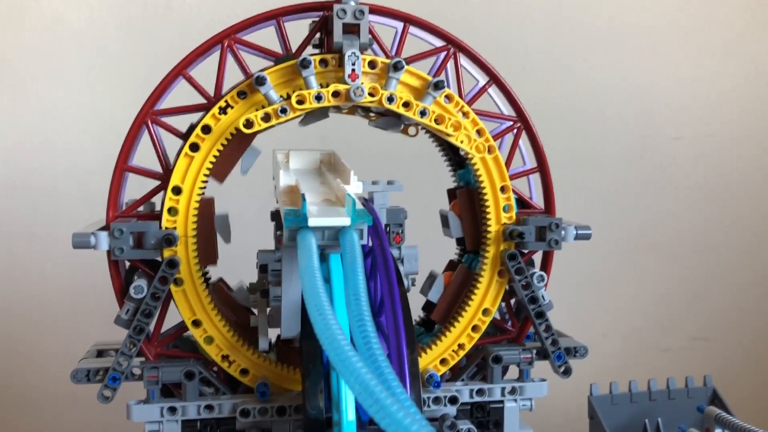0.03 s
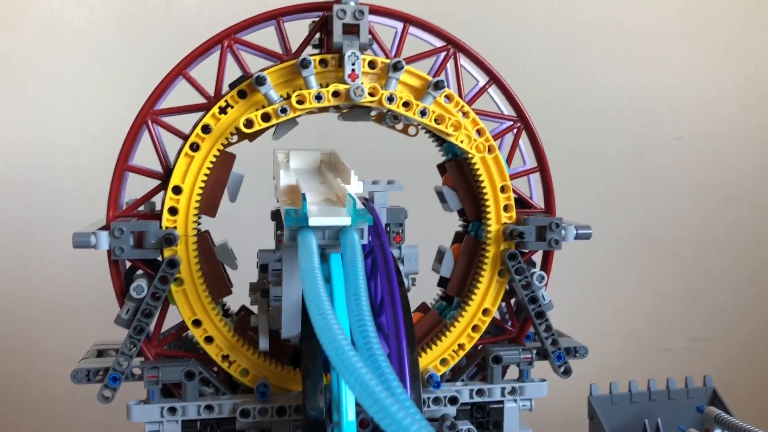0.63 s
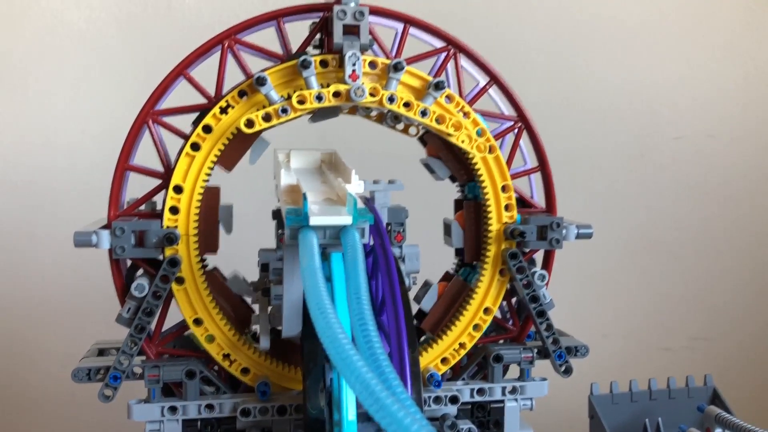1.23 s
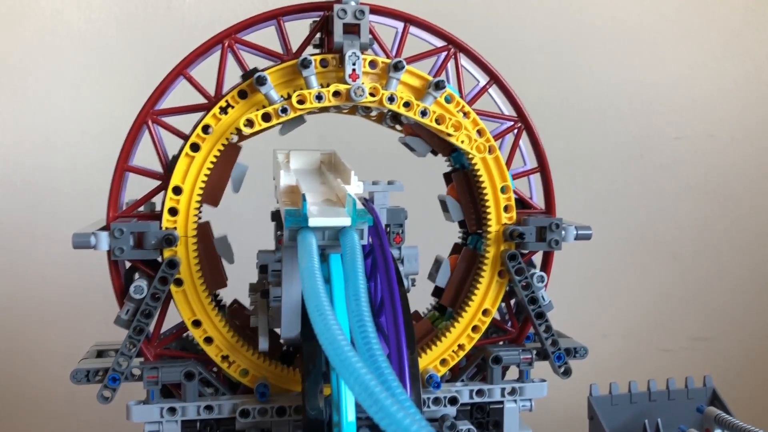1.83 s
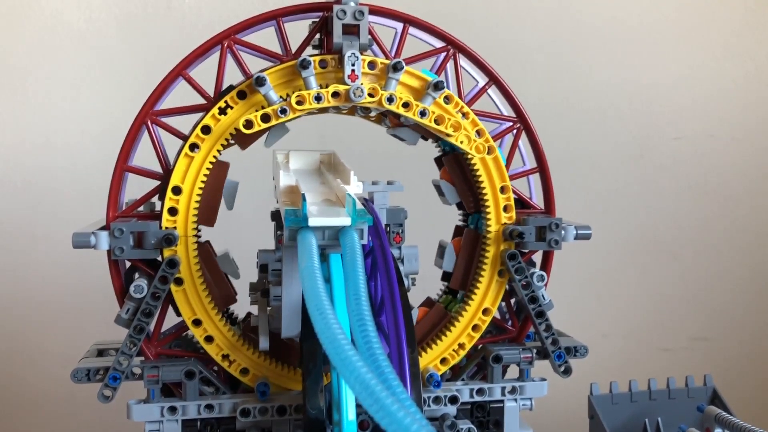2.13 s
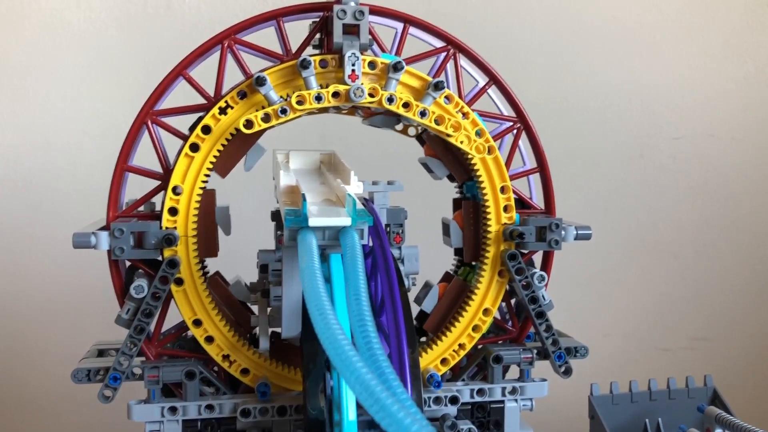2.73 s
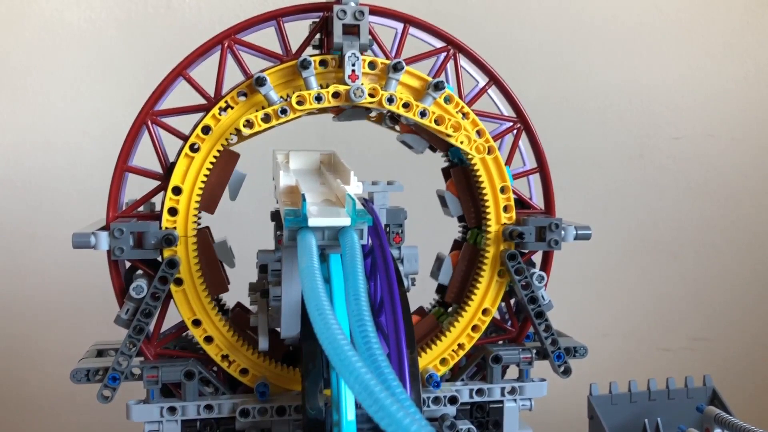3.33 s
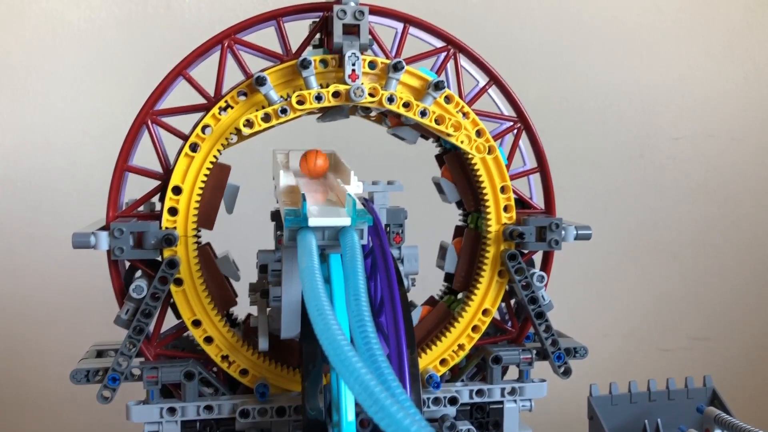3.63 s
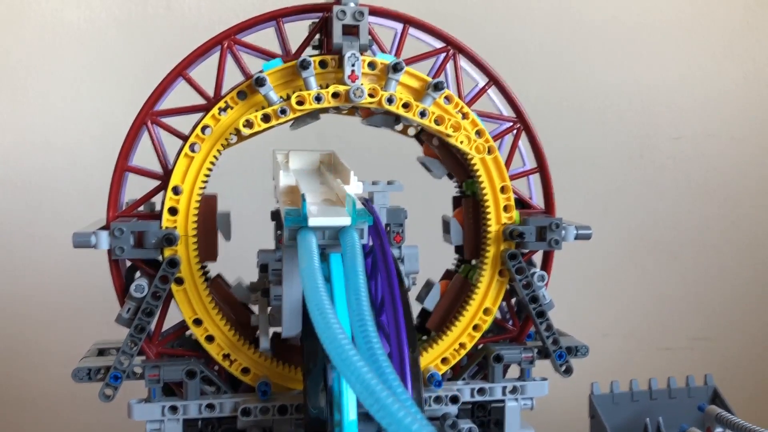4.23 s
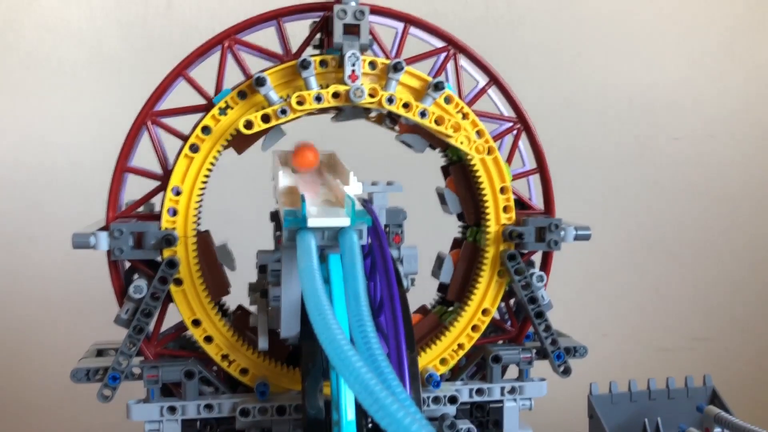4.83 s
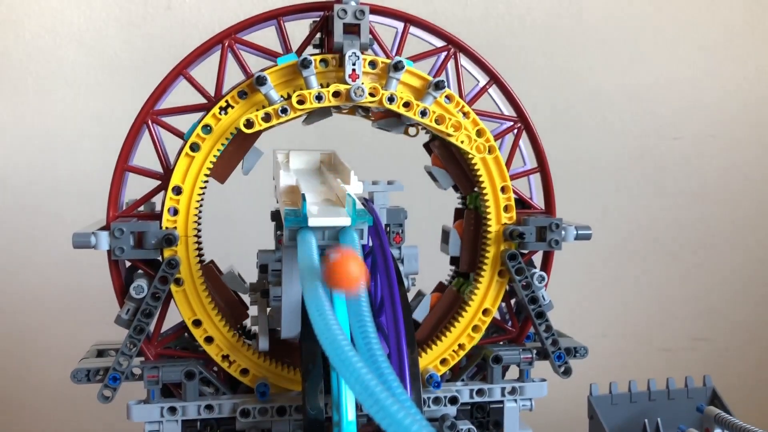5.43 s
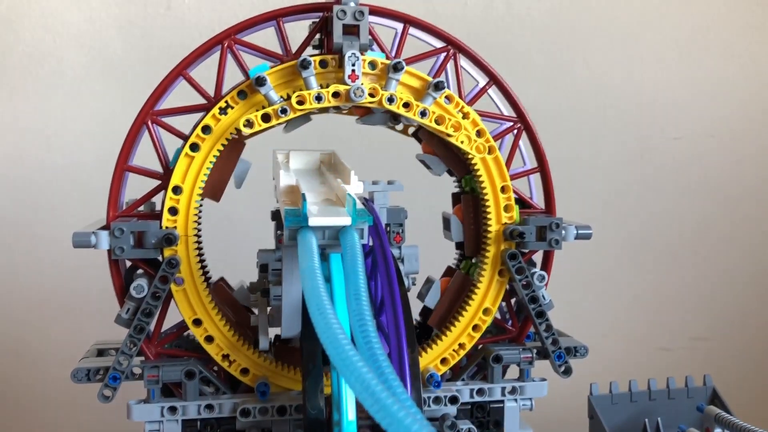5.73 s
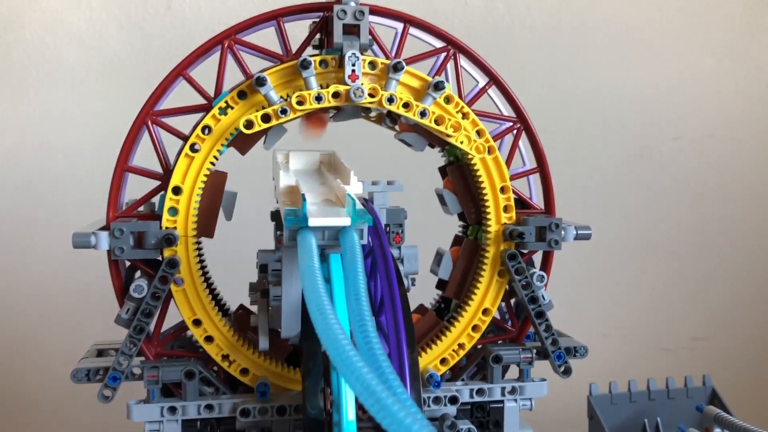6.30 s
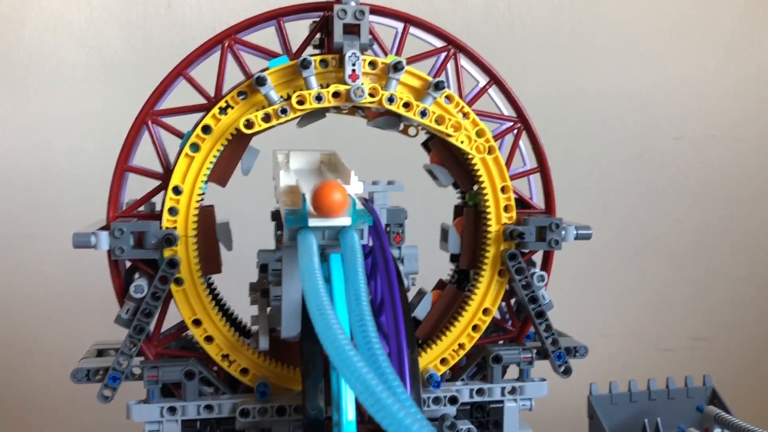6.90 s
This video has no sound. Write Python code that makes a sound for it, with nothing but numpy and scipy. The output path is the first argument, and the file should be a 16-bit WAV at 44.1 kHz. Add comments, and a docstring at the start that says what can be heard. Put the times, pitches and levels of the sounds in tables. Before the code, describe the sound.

A small electric motor drives a big wheel of plastic toy bricks, heard close by in a small room. For all seven seconds it hums over a low growl, with a thin gear whine, a fast rasp of teeth and small irregular ticks. A plastic ball clacks onto a chute right at the start. Parts of the wheel snap over with bright clicks and brief rattles, most clearly at the start and around 1.5, 3 and 4.3 seconds. A lighter ball clatter comes at about 3.7 seconds. Around 4.5 seconds a ball rumbles softly in its pocket, then lands on the chute at 4.9 with a sharp clack, bounces a few times and rolls away, tapping over the seams. Another rumbles near 6 seconds, lands at 6.3, bounces and rolls off by about 6.8 while the motor keeps running.

```python
"""A small electric motor turns a big toy wheel of plastic bricks, close by in a small room.
A plastic ball clacks onto a brick chute at the start, over a drive that runs throughout: the motor
hums, axles growl in the frame, the gearbox whines and its teeth rasp. Until 4.4 s parts of the wheel
snap over and rattle loose bricks. Then a ball rumbles over the top in its pocket, drops onto the chute
at 4.9 s, bounces a few times and rolls away. The next one follows at 6.3 s."""
import sys
import numpy as np
from scipy import signal
from scipy.fft import rfft, irfft, next_fast_len
from scipy.io import wavfile
from scipy.ndimage import map_coordinates

SR = 44100
rng = np.random.default_rng(int(sys.argv[2]) if len(sys.argv) > 2 else 0)


def unload_audio(sound):
    """Save the sound as a 16-bit wav file, at the path given as the first command line argument."""
    columns = np.transpose(np.atleast_2d(sound))
    # keep every value between -1 and 1, then stretch to whole-number steps
    steps = np.round(np.clip(columns, -1, 1) * 32767)
    wavfile.write(sys.argv[1], SR, steps.astype(np.int16))


N = 311346
TIME = np.arange(N) / SR
COMMUTATOR_HZ, MESH_HZ = 411.9, 75.0  # six times the rotor rate; pinion teeth landing per second

# Partials of the hum: (multiple of the rotor rate)
HUM_ORDERS = [2, 3, 6]
# Level rides for the hum at twice and at three times the rotor rate: (time [s], level [dB])
SECOND_ORDER_RIDE = [(0.0, -48.5), (0.8, -57), (1.85, -47.5), (2.15, -89), (3.8, -57), (4.3, -57.5),
                     (7.06, -57)]
THIRD_ORDER_RIDE = [(0.0, -48), (0.19, -48), (0.3, -59), (1.55, -53), (2.08, -78), (2.2, -43.5),
                    (2.82, -51), (2.93, -54), (3.05, -47), (3.52, -72), (3.7, -39.5), (3.88, -56),
                    (4.05, -47.5), (5.05, -44.5), (5.35, -51), (7.06, -48.5)]

def motor_hum(rotor_turns, commutator_db=-48, mains_hz=94, mains_db=-62):
    """Two nearly clean rotor partials follow the load, over a commutator tone and faint mains hum."""
    levels_db = [*in_time(SECOND_ORDER_RIDE), *in_time(THIRD_ORDER_RIDE), commutator_db]
    out = from_db(mains_db) * np.sin(2 * np.pi * mains_hz * TIME)
    for order, db in zip(HUM_ORDERS, levels_db):
        level = from_db(db + 2.0 * drift(13))
        out += level * np.sin(2 * np.pi * (order * rotor_turns + 0.051 * drift(8.3)))
    return out


# The gear train under its slowly changing load: (time [s], growl level [dB], whine pitch [Hz])
LOAD_RIDE = [(0.0, -43, 2430), (0.9, -45, 2457), (1.5, -44.5, 2443), (2.7, -45.5, 2425), (4.0, -45, 2416),
             (4.7, -43, 2427), (5.4, -45, 2410), (5.8, -42.5, 2480), (6.3, -42.5, 2410),
             (7.06, -44.5, 2486)]
# Resonances of the brick frame: (pitch [Hz], width [Hz], level [dB])
FRAME_RESONANCES = [(126.6, 36, -6.5), (198.2, 24, -1), (293, 77, -1), (409.4, 101, 0), (534.6, 61, -2.5),
                    (641.5, 53, -4), (1016, 125, -7), (1632, 99, -11.5), (2137, 200, -16)]

def axle_growl(rotor_turns):
    """Loose axles knock in the frame with each turn of the rotor and of a gear three times slower."""
    growl_db, _ = in_time(LOAD_RIDE)
    level = from_db(growl_db + .8 * drift(14))
    gear_angle = 2 * np.pi * rotor_turns / 3
    throb = np.exp(0.25 * sum(np.cos(k * gear_angle) for k in range(1, 4)))
    knocks = rng.standard_normal(N) * throb * from_db(-0.55 * drift(120))
    frame = sum((-1) ** k * from_db(db) * steep_resonance(knocks, hz, 1.05 * width)
                for k, (hz, width, db) in enumerate(FRAME_RESONANCES))
    return level * rms_one(frame)


# Tight spots of the slow shafts drag the motor: (rate [turns/s], first tight spot [s], pitch sag [Hz])
PITCH_SAGS = [(2.185, .433, 5), (1.52, .58, 3)]

def gear_whine(level_db=-53.5, wander_hz=6, jitter_hz=23.9, roughness=0.47):
    """The first, fast gear pair sings a raspy tone: uneven teeth spread noise around its pitch."""
    _, load_hz = in_time(LOAD_RIDE)
    sag_hz = sum(hz * np.cos(2 * np.pi * rate * (TIME - s)) for rate, s, hz in PITCH_SAGS)
    pitch_hz = load_hz - sag_hz + wander_hz * drift(12) + jitter_hz * drift(150)
    phase = 2 * np.pi * np.cumsum(pitch_hz) / SR
    tone = np.sin(phase) * from_db(2.0 * drift(40))
    grit = drift(260) * np.sin(phase) + drift(260) * np.cos(phase)
    return from_db(level_db) * rms_one(tone + roughness * grit)


# How hard each of the eight pinion teeth meshes: (accent [dB])
TOOTH_ACCENTS = [6, 3.5, 2.5, 6.5, -23, 5, 6, -18.5]
# Tone colour of the rasp: (frequency [Hz], level [dB])
RASP_EQ = [(1500, -12.5), (2700, -9.5), (3250, -13), (4250, -11.5), (5400, -8.5), (6000, -6), (6400, -6),
           (7200, -1), (7800, -4.5), (8500, -3), (10000, -8), (11900, -7), (12600, -10), (13900, -5),
           (14800, -9.5), (15600, -6.5)]
# Beams and gear wheels that the teeth set whirring: (pitch [Hz], width [Hz], level [dB])
WHIRR_RESONANCES = [(2106, 220, -65), (3090, 130, -65.5), (3590, 160, -60), (4100, 110, -66),
                    (4450, 150, -63.5), (4806, 72, -61), (5440, 120, -65), (6000, 230, -56),
                    (6710, 200, -59.5), (7230, 490, -51), (8440, 750, -53), (11950, 670, -64)]

def tooth_rasp(teeth, rasp_db=-41, slip_share=0.27, sliding=0.98):
    """Each tooth lands with a short scratch over steady sliding friction; plastic parts whirr along."""
    tooth = teeth.astype(int)
    accent_db = np.array(TOOTH_ACCENTS)[tooth % len(TOOTH_ACCENTS)]
    accent_db = accent_db + 3.5 * rng.uniform(-1.1, 1, 1000)[tooth]
    scratch = from_db(accent_db) * np.exp(-(teeth % 1) / slip_share)
    force = np.hypot(sliding, scratch)
    friction = rng.standard_normal(N) * force * from_db(drift(500))
    out = from_db(rasp_db) * coloured(friction, RASP_EQ)
    for hz, width, db in WHIRR_RESONANCES:
        rub = rng.standard_normal(N) * force * from_db(2.5 * drift(40))
        out += from_db(db) * rms_one(steep_resonance(rub, hz, width))
    return out


# Each shaft binds once a turn and swells the chatter: (rate [turns/s], first tight spot [s], swing [dB])
SHAFT_SWELLS = [(1.75, .02, 1.3), (5.15, 0, 1.1), (6.92, 0, 1.1), (19.205, .046, 1.9), (27.926, 0, 1.0)]

def gearbox_chatter(teeth, level_db=-50, housing_hz=1244.4, jitter_hz=22.23):
    """A rough gear tone in a housing resonance, shaken three times a turn by the eight-tooth pinion."""
    binding_db = sum(db * np.cos(2 * np.pi * rate * (TIME - s)) for rate, s, db in SHAFT_SWELLS)
    level = from_db(level_db + binding_db + 1.9 * drift(90))
    throb = np.exp(0.16 * np.cos(2 * np.pi * teeth * 3 / 8))
    tone = np.sin(2 * np.pi * np.cumsum(housing_hz + jitter_hz * drift(70)) / SR)
    rattle = steep_resonance(rng.standard_normal(N), housing_hz, width=196)
    return level * rms_one((rms_one(tone) + from_db(-1.0) * rms_one(rattle)) * throb)


# Ticks in the housing and lower knocks in the frame: (time [s], peak [dB], pitch [Hz])
CATCH_CUES = [(0.154, -33, 1270), (0.275, -34, 422), (0.576, -40, 1250), (0.723, -37, 1280),
              (0.754, -37.5, 1260), (0.974, -37, 1250), (1.185, -37.5, 1250), (1.192, -35, 430),
              (1.292, -33.5, 1270), (1.399, -39, 1290), (1.716, -35, 1250), (1.756, -35.5, 1260),
              (1.824, -40, 1240), (1.89, -33, 423), (2.171, -43, 1270), (2.433, -36, 1240),
              (2.743, -34, 1240), (2.859, -33, 415), (2.966, -39, 1260), (3.114, -33.5, 1250),
              (3.335, -39, 1270), (3.475, -31, 1240), (3.582, -34, 1260), (3.608, -31, 422),
              (3.687, -37, 1250), (3.83, -34, 420), (3.901, -41, 1250), (4.046, -33, 420),
              (4.046, -38, 1260), (4.507, -38.5, 1260), (4.696, -33, 413), (4.73, -42, 1250),
              (4.839, -32, 420), (5.049, -32.5, 1270), (5.611, -36.5, 1290), (5.769, -35, 1260),
              (5.982, -38, 1260), (6.267, -43, 1250), (6.773, -31, 444), (6.874, -37, 1280),
              (6.914, -36, 1240), (7.021, -30.5, 1260)]

def gear_catches(half_length_s=0.0044):
    """A catching gear drives one resonance for a few milliseconds."""
    t = TIME[:SR // 10] - .05
    out = np.zeros(N)
    for s, db, hz in CATCH_CUES:
        detuned_hz = hz * (1 + 0.022 * rng.standard_normal())
        tone = np.sin(2 * np.pi * (detuned_hz * t + rng.random()))
        add(out, s + t[0], from_db(db) * tone * np.exp(-(t / half_length_s) ** 2))
    return out


# Ring of the chute: (pitch [Hz], level within its band [dB], t60 [s])
CHUTE_RING = [(2053, -3, 0.051), (2344, 4.5, 0.028), (2450, 1.5, 0.021), (2640, -10, 0.034),
              (2740, -3.5, 0.032), (2870, -9, 0.077), (2965, -4, 0.049), (3193, 1, 0.026),
              (3790, -5, 0.021), (4340, -3, 0.019), (5090, 0, 0.016), (5830, 0.5, 0.011), (6600, -4, 0.017),
              (6860, -5, 0.015), (7870, 2, 0.0068), (9030, -1, 0.0052), (10300, 4, 0.0033),
              (12100, 4, 0.0051), (13600, -2, 0.006), (15300, -3, 0.0056)]
# Landings and bounces: (time [s], six band levels [dB], brick pitch [Hz], brick ring over its band [dB])
BALL_CUES = [(0.0054, -29, -41, -32, -32, -36, -42, 2320, 17),
             (3.6529, -37.0, -29.5, -28, -25, -29.5, -30, 7300, -3),
             (3.7027, -43, -38, -38, -28, -34, -29, 5930, -7),
             (3.7346, -56.0, -46, -44, -34, -43, -45.0, 6010, -4),
             (4.862, -11.5, -18.5, -22.5, -24, -25, -31, 2490, 0),
             (4.9, -24, -26, -19, -26, -31, -30, 4400, 1),
             (4.9095, -56.0, -28, -57.5, -50.0, -53.5, -53.0, 2900, 8),
             (4.9528, -20, -32, -26.5, -22, -23, -27, 7080, 4),
             (4.9703, -20.5, -31, -49, -20, -35.0, -34, 5760, 5),
             (5.0676, -52.5, -42, -55, -35.5, -35, -42.0, 7760, -2),
             (6.3113, -13, -18.5, -26, -24.5, -29, -43, 2432, 0.5),
             (6.3521, -28, -21, -24.5, -23.5, -27.5, -29, 6200, 5),
             (6.3615, -32, -26, -57.5, -50.0, -53.5, -53.0, 2880, 4),
             (6.3875, -28, -23.5, -31, -39, -42.5, -45.0, 3130, 5),
             (6.4075, -31.0, -38.0, -44.5, -31, -36, -37, 5900, 1),
             (6.415, -26, -47.0, -52.0, -50.0, -53.5, -53.0, 2350, 12),
             (6.4355, -54, -33, -48, -48, -53.5, -50.5, 3170, 6),
             (6.4613, -34.5, -34, -32.5, -24.5, -29.5, -28, 5960, -8),
             (6.7555, -39, -45, -47, -42, -37, -49, 2340, -6)]

def ball_drops():
    """Plastic balls land on the brick chute and bounce with hard clacks."""
    return impacts(BALL_CUES, CHUTE_RING, crack_db=-4, crack_t60=0.022, brick_t60=0.023,
                   knock_db=-47.5, thud_db=-46.0, thud_t60=0.24,
                   wall_hz=4600, tail_t60=0.25, wet_db=-16, gain_db=-1.5)


# Taps on the seams: (time [s], three low band levels [dB], brick pitch [Hz], ring over its band [dB])
SEAM_CUES = [(4.9965, -42, -41, -46, 2730, 0), (5.1244, -48, -52, -46, 3730, 0),
             (5.1696, -32, -43, -52, 2420, -2), (5.2390, -48, -48, -42, 4000, 0),
             (5.2933, -43, -46, -44, 4300, -6), (6.5230, -48, -38, -41.5, 2890, 2),
             (6.5570, -40, -44, -43, 2920, 0), (6.6240, -34.5, -37, -52, 3190, 1),
             (6.6360, -42, -43, -54, 2310, 0), (6.7675, -36.5, -51, -44, 2440, 0)]
# The dull top end of every tap, in the three upper bands: (level [dB])
SEAM_TOP_END = [-52, -54, -62]

def seam_taps():
    """A rolling ball taps over the seams of the chute; the lightly struck bricks ring hollow."""
    taps = [(s, *lows_db, *SEAM_TOP_END, hz, ring_db) for s, *lows_db, hz, ring_db in SEAM_CUES]
    return impacts(taps, CHUTE_RING, crack_db=-6, crack_t60=.025, brick_t60=0.13,
                   knock_db=-59, thud_db=-47, thud_t60=0.24,
                   wall_hz=4450, tail_t60=0.27, wet_db=-16, gain_db=-2.5)


# Ring of the wheel: (pitch [Hz], level within its band [dB], t60 [s])
WHEEL_RING = [(2420, 0, .014), (3330, 0, .03), (3900, -2, .04), (4280, -1, .012), (4660, 0, .014),
              (5100, -5, .01), (5650, -3, .011), (6200, -4, .009), (6780, -1, .012), (7300, -2, .012),
              (8400, 0, .01), (10000, -3, .01), (13500, 0, .012)]
# Snaps of the wheel: (time [s], six band levels [dB], brick pitch [Hz], brick ring over its band [dB])
SNAP_CUES = [(0.045, -39, -31, -27.5, -31.5, -34, -40, 4280, 7),
             (0.182, -58, -55, -49, -54, -55, -55, 3980, 2),
             (0.3007, -45, -46, -43, -42, -50, -48.0, 3400, -14),
             (1.119, -49, -51, -46, -53, -53, -52, 4280, 6),
             (1.1733, -56.0, -42.5, -52, -47, -45, -53.0, 3320, 0),
             (1.1984, -41, -44, -47, -45, -43, -53.0, 3360, 3),
             (1.5066, -40, -34, -25.5, -26, -31, -34.5, 6860, -2),
             (1.637, -52, -60, -55, -46, -52, -55, 6700, -2),
             (1.8205, -49, -54, -48, -49, -50, -55, 4300, 0),
             (2.521, -46, -56, -51, -47, -50, -55, 7230, 0),
             (3.003, -47.5, -51.0, -48.0, -50, -47.0, -49, 3900, -1),
             (3.028, -33.5, -36, -22.5, -30, -30, -39, 3920, -4),
             (3.0903, -49.0, -45, -33, -45, -50.0, -53.0, 4160, -6),
             (3.398, -53, -51, -52, -54, -55, -55, 3500, 0), (3.93, -53, -50, -48, -48, -53, -55, 4100, 0),
             (4.3294, -38, -52, -23, -29.5, -37, -41, 4080, -6),
             (4.356, -42, -53, -45, -49, -52, -55, 3900, 0), (4.369, -47, -53, -46, -52, -54, -55, 4000, 4)]

def wheel_snaps():
    """Parts of the turning wheel snap over: a bright click with a long thud under it."""
    return impacts(SNAP_CUES, WHEEL_RING, crack_db=-4, crack_t60=0.021, brick_t60=0.026,
                   knock_db=-49, thud_db=-39.5, thud_t60=0.67,
                   wall_hz=9300, tail_t60=0.32, wet_db=-14.0, gain_db=-0.5)


def impacts(cues, modes, crack_db, crack_t60, brick_t60, knock_db, thud_db, thud_t60,
            wall_hz, tail_t60, wet_db, gain_db):
    """Each contact clacks, shakes the frame and is thrown back by table and walls."""
    out = np.zeros(N)
    for s, *bands_db, brick_hz, brick_db in cues:
        attack = from_db(gain_db) * clack(modes, bands_db, brick_hz, brick_db,
                                          crack_db, crack_t60, brick_t60)
        # the body gains half a dB for each dB of the blow
        body = from_db(0.5 * max(bands_db)) * knock_and_thud(knock_db, thud_db, thud_t60, thud_hz=228)
        add(out, s, room(attack + body, tail_t60, wet_db, wall_hz))
    return out


# The six bands of a clack; the place of contact sets how hard each is struck: (low [Hz], high [Hz])
CLACK_BANDS = [(1950, 2650), (2650, 3600), (3600, 5300), (5300, 8300), (8300, 11000), (11000, 16000)]

def clack(modes, bands_db, brick_hz, brick_db, crack_db, crack_t60, brick_t60, contact_s=0.00012):
    """One contact: a dry crack and ringing modes in each band, and in one of them the struck brick."""
    t = TIME[:SR // 5]
    hz, db, t60 = np.transpose(modes)[:, :, None]
    onset = 1 - np.exp(-t / contact_s)  # the modes build up while the parts touch
    strength = from_db(db + 1.5 * rng.standard_normal(hz.shape)) * rng.choice([-1, 1], hz.shape)
    detuned_hz = hz * (1 + 0.0042 * rng.standard_normal(hz.shape))
    rings = onset * strength * decay(t, t60) * np.sin(2 * np.pi * detuned_hz * t)
    brick = clack_one(onset * np.cos(2 * np.pi * brick_hz * t) * decay(t, brick_t60))
    out = 0
    for (low, high), level_db in zip(CLACK_BANDS, bands_db):
        burst = rng.standard_normal(len(t)) * decay(t, crack_t60)
        crack = band(band(burst, low, high), low, high)
        ring = np.sum(rings * ((hz >= low) & (hz < high)), axis=0)
        layer = clack_one(clack_one(ring) + from_db(crack_db) * clack_one(crack))
        if low <= brick_hz < high:
            layer += from_db(brick_db) * brick
        out += from_db(level_db) * clack_one(layer)
    return band(out, 1300, 19000)


# The hollow under the bricks: (pitch [Hz], width [Hz], level [dB])
HOLLOW_RESONANCES = [(826, 54, -2.5), (1040, 55, -5), (1410, 430, -4.5), (1648, 39, -3.5)]

def knock_and_thud(knock_db, thud_db, thud_t60, thud_hz, rise_s=0.0052):
    """The hollow under the bricks knocks; the heavy frame takes a moment to move, then thuds."""
    t = TIME[:SR // 5]
    push = rng.standard_normal(len(t)) * decay(t, 0.017)
    knock = sum(from_db(db) * rms_one(resonance(push, hz, width)) for hz, width, db in HOLLOW_RESONANCES)
    sway = rng.standard_normal(len(t)) * (1 - np.exp(-t / rise_s)) * decay(t, thud_t60)
    thud = rms_one(steep_resonance(sway, thud_hz, width=thud_hz))
    return from_db(knock_db) * knock + from_db(thud_db) * thud


# Ring of the loose bricks: (pitch [Hz], width [Hz], level [dB])
LOOSE_RESONANCES = [(2550, 240, -2), (3430, 130, -1), (3860, 100, 1), (4700, 300, 1), (7000, 3000, -6)]

def brick_rattles(ticks_per_s=240, t60=0.19, relative_db=-21):
    """Each snap shakes loose bricks into a short dying run of ticks."""
    t = TIME[:SR // 5]
    out = np.zeros(N)
    for s, *bands_db, _, _ in SNAP_CUES:
        contacts = rng.random(len(t)) < ticks_per_s / SR
        ticks = contacts * rng.choice([-1, 1], len(t)) * decay(t, t60)
        rings = sum((-1) ** k * from_db(db) * resonance(ticks, hz, width)
                    for k, (hz, width, db) in enumerate(LOOSE_RESONANCES))
        add(out, s, from_db(max(bands_db) + relative_db) * rms_one(rings))
    return out


# Dull bumps with no clack: (time [s], thud level [dB], thud pitch [Hz], knock level [dB])
BUMP_CUES = [(0.298, -57, 160, -67), (0.668, -46, 284, -60), (3.652, -66, 230, -53.5),
             (4.865, -56, 95, -63), (4.953, -57, 230, -52.5), (6.331, -50, 90, -57), (6.355, -46, 220, -59),
             (6.462, -54, 300, -53), (6.756, -52, 230, -65)]

def frame_bumps(thud_t60=0.058):
    """The hollow frame booms under a ball or a lurch of the wheel."""
    out = np.zeros(N)
    for s, thud_db, thud_hz, knock_db in BUMP_CUES:
        bump = knock_and_thud(knock_db, thud_db, thud_t60, thud_hz)
        add(out, s, room(bump, t60=.27, wet_db=-15.5, wall_hz=5130))
    return out


# One roll around each landing: (landing time [s], level on the chute [dB])
ROLL_CUES = [(0.005, -69), (4.862, -48.5), (6.311, -47.5)]

def ball_rolls(pocket_lead_s=0.25, pocket_boost_db=2, chute_lag_s=0.27, fade_db_per_s=52):
    """A ball rolls out of its pocket, then down the chute: two swells of the lowest chute modes."""
    swells_db = [db + boost_db - fade_db_per_s * np.abs(TIME - s - lag)
                 for s, db in ROLL_CUES
                 for lag, boost_db in [(-pocket_lead_s, pocket_boost_db), (chute_lag_s, 0)]]
    grain = rng.standard_normal(N) * from_db(5.0 * np.tanh(drift(110)))
    rings = sum(from_db(db) * resonance(grain, hz, width=63) for hz, db, _ in CHUTE_RING[:8])
    return from_db(np.max(swells_db, axis=0)) * rms_one(band(rings, 1460, 2560))


# A ball is carried over the top of the wheel: (time [s], level [dB])
CARRY_CUES = [(4.5, -48), (6.05, -47.5)]
# The hollow pocket it rides in: (pitch [Hz], width [Hz], level [dB])
POCKET_RESONANCES = [(288, 62, 7), (830, 340, -6)]

def pocket_rumble(half_length_s=0.54, grain_db=4.5):
    """The carried ball trundles unevenly against the walls of its pocket."""
    trundle = rng.standard_normal(N) * from_db(grain_db * np.tanh(drift(50)))
    rings = sum(from_db(db) * steep_resonance(trundle, hz, width) for hz, width, db in POCKET_RESONANCES)
    swells = sum(from_db(db) * np.exp(-((TIME - s) / half_length_s) ** 2) for s, db in CARRY_CUES)
    return swells * rms_one(rings)


# Tone colour of the frame's rumble: (frequency [Hz], level [dB])
RUMBLE_EQ = [(30, -41), (42, -10), (55, -10.5), (72, -8), (125, -3.5), (165, -7.5), (200, 5.5), (238, -4),
             (290, -17), (480, -1.5), (720, -6.5), (1150, -12.5), (1450, -15), (2000, -22)]

def frame_rumble(level_db=-47.5):
    """The frame rumbles, a steady low bed under the drive."""
    return from_db(level_db) * coloured(rng.standard_normal(N), RUMBLE_EQ)


def room(x, t60, wet_db, wall_hz):
    """Dense, duller reflections from table and walls; every place of contact has its own."""
    t = TIME[:SR // 4]
    tail = band(rng.standard_normal(len(t)), 210, wall_hz) * decay(t, t60) * (t > .004)
    tail /= np.sqrt(np.sum(tail ** 2))
    return x + from_db(wet_db) * signal.fftconvolve(x, tail)[:len(x)]


def from_db(db):
    """Decibels to gain."""
    return 10 ** (np.asarray(db) / 20)


def decay(t, t60):
    """An envelope that falls 60 dB in t60 seconds."""
    return from_db(-60 * t / t60)


def rms_one(x):
    """Scale to rms 1."""
    return x / np.sqrt(np.mean(x ** 2) + 1e-20)


def clack_one(x):
    """Scale a short sound to the energy of rms 1 held for 10 ms."""
    return x / np.sqrt(np.sum(x ** 2) / (.01 * SR) + 1e-20)


def in_time(rows):
    """The columns of a ride at every sample."""
    s, *columns = np.transpose(rows)
    return [np.interp(TIME, s, c) for c in columns]


def drift(rate):
    """Smooth random modulation with a spread near 1, `rate` new values a second."""
    knots = rng.standard_normal(4000)
    return map_coordinates(knots, [TIME[::50] * rate], order=3, mode="wrap").repeat(50)[:N]


def band(x, low_hz, high_hz):
    """Causal band-pass."""
    sos = signal.butter(2, [low_hz, min(high_hz, .45 * SR)], "band", fs=SR, output="sos")
    return signal.sosfilt(sos, x)


def resonance(x, hz, width):
    """Two-pole resonance, gain 1 on top."""
    r = np.exp(-np.pi * width / SR)
    feedback = [1, -2 * r * np.cos(2 * np.pi * hz / SR), r * r]
    return signal.lfilter(np.array([1, 0, -1]) * (1 - r * r) / 2, feedback, x)


def steep_resonance(x, hz, width):
    """The same resonance twice, for steeper skirts."""
    return resonance(resonance(x, hz, width), hz, width)


def coloured(x, eq):
    """Shape a steady sound with an EQ curve that rolls off past both ends; rms 1."""
    hz, db = np.transpose(eq)
    size = next_fast_len(N)
    f = np.maximum(np.fft.rfftfreq(size, 1 / SR), 1)
    skirts = np.minimum(f / hz[0], 1) ** 2 * np.minimum(hz[-1] / f, 1) ** 2
    gain = skirts * from_db(np.interp(np.log(f), np.log(hz), db))
    return rms_one(irfft(rfft(x, size) * gain, size)[:N])


def add(out, s, sound):
    """Mix a sound in at time s."""
    start = max(int(s * SR), 0)
    out[start:start + len(sound)] += sound[:N - start]


def scene():
    """The mono mix: the running drive, the balls and the wheel's snaps."""
    rotor_turns = np.cumsum(COMMUTATOR_HZ / 6 * (1 + .004 * drift(4))) / SR
    teeth = np.cumsum(MESH_HZ * (1 + 0.0043 * drift(2))) / SR
    drive = motor_hum(rotor_turns) + axle_growl(rotor_turns) + frame_rumble()
    gears = gearbox_chatter(teeth) + gear_catches() + gear_whine() + tooth_rasp(teeth)
    hits = ball_drops() + seam_taps() + wheel_snaps() + brick_rattles() + frame_bumps()
    rolls = ball_rolls() + pocket_rumble()
    return (drive + gears + hits + rolls)[None]


def record(dry, cutoff_hz=15850):
    """Soft saturation rounds the highest peaks; a steep low-pass cuts the top."""
    rounded = np.tanh(dry / 0.99)
    return signal.sosfilt(signal.ellip(12, .1, 70, cutoff_hz, fs=SR, output="sos"), rounded)


dry = scene()
out = record(dry)
unload_audio(out)
```